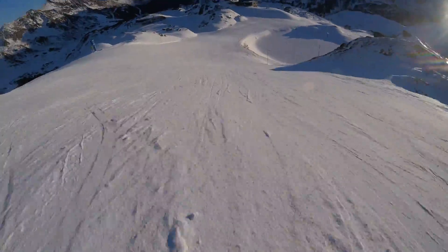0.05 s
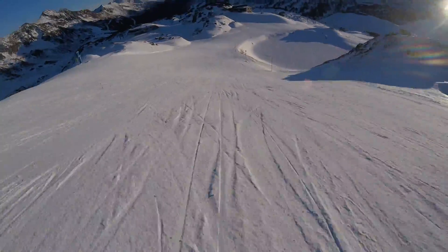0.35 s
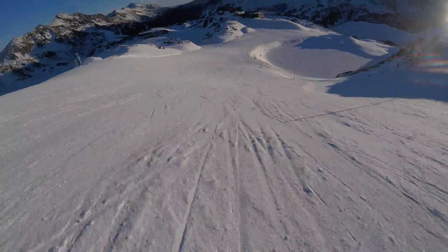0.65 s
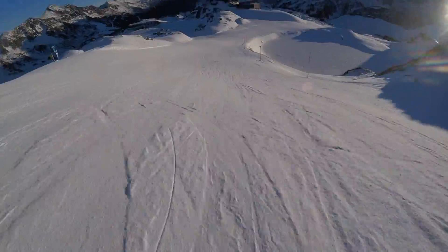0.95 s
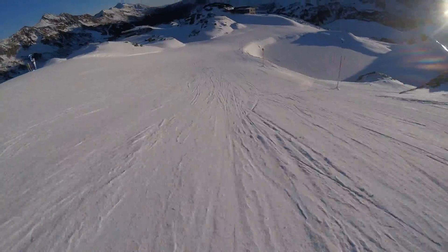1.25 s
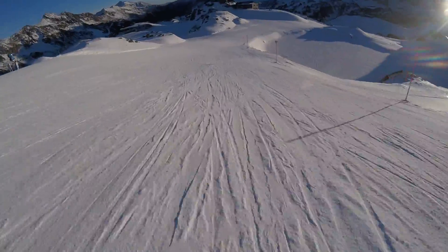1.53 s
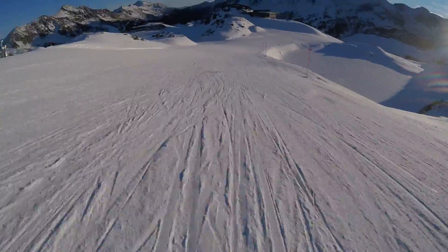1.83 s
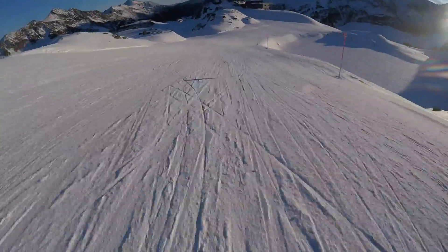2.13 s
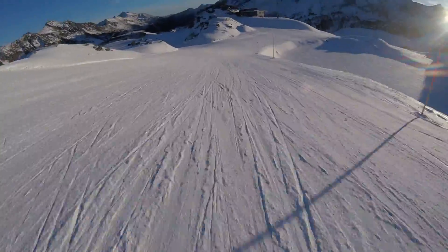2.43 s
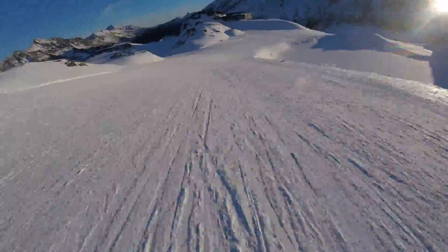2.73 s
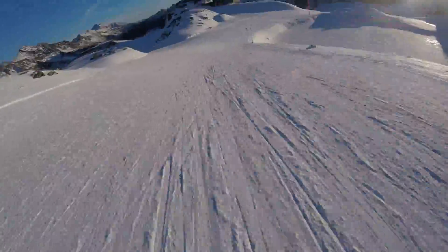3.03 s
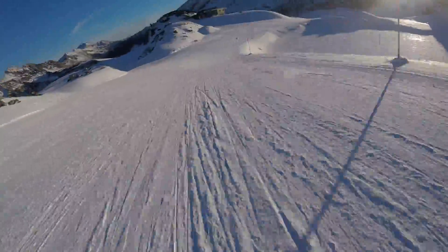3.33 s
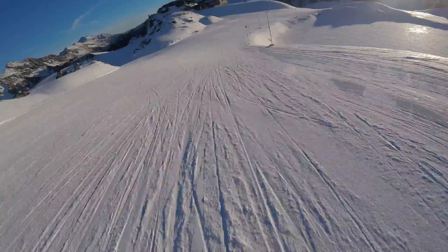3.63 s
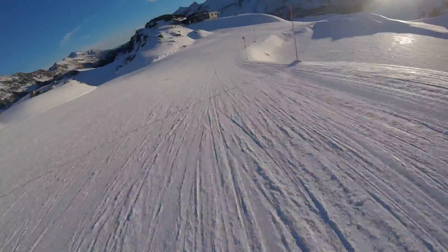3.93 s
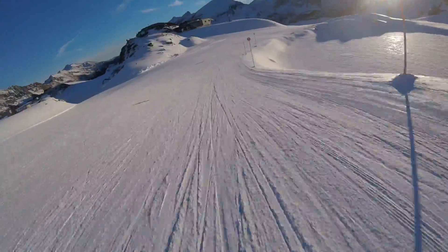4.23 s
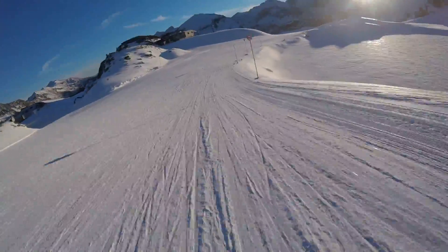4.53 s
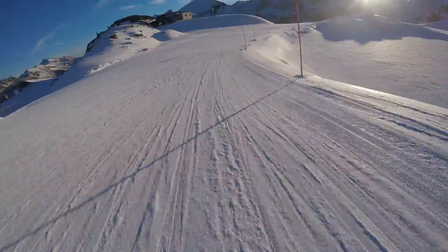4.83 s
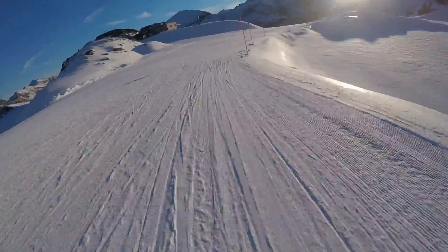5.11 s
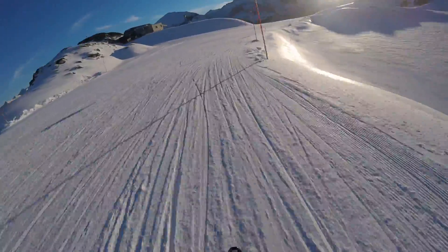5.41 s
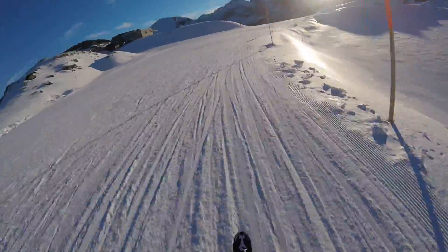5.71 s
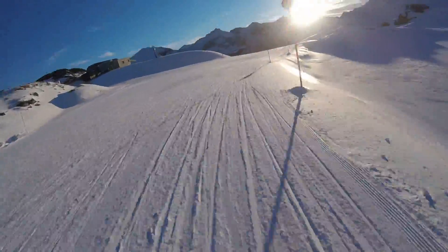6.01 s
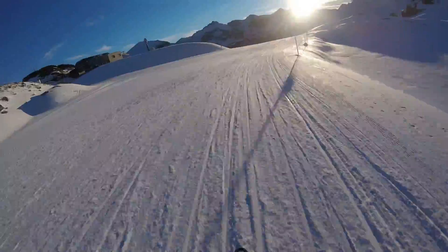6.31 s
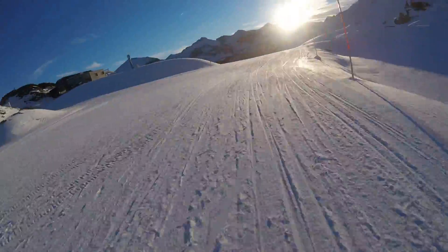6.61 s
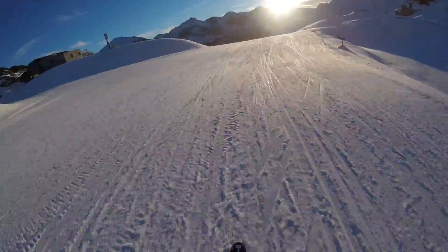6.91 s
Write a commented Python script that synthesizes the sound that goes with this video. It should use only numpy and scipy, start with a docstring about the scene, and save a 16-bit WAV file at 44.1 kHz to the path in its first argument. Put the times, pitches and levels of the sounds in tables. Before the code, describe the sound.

Skis run down a groomed slope with a continuous, grainy hiss, their edges scraping over hard snow under a faint fizz of powder. Head wind rumbles and gusts against the skier's camera and blows a hollow, airy note in its housing. Bumps shake the mount with short, low thuds, coming more often after about two seconds. Everything sounds close and boxy, heard from inside the closed camera case.

```python
"""Skis run down a groomed slope of hard snow, heard from an action camera worn by the skier.
Countless snow grains break under the bases and edges; their hiss rings in the camera's closed housing.
Fine powder sprays on top, and now and then an edge sizzles over ice.
Head wind buffets the housing and blows its main cavity; wind and bumps make the mount boom."""
import sys
import numpy as np
from scipy import signal
from scipy.fft import rfft, irfft
from scipy.io import wavfile
from scipy.ndimage import uniform_filter1d, minimum_filter1d

SR = 44100
rng = np.random.default_rng(int(sys.argv[2]) if len(sys.argv) > 2 else 0)


def waveform_to_disk(signal):
    """Save audio, clipped to [-1, 1], as 16-bit WAV at the path in sys.argv[1]."""
    frames = np.transpose(np.atleast_2d(signal))
    scaled = np.clip(frames, -1, 1) * 32767
    samples = np.round(scaled).astype(np.int16)
    wavfile.write(sys.argv[1], SR, samples)


N = 311346
TIME = np.arange(N) / SR
FREQS = np.maximum(np.fft.rfftfreq(N, 1 / SR), 1)


def undb(db):
    """Decibels to gain."""
    return 10 ** (np.asarray(db) / 20)


def unit(x):
    """Scale to an rms of one."""
    return x / np.sqrt(np.mean(x ** 2))


def fader_curves(table):
    """One curve per level column, ramping between the rows' times."""
    times, *columns = np.transpose(table)
    return [np.interp(TIME, times, column) for column in columns]


def swell(centre, length):
    """A bell-shaped rise and fall that peaks at one; times in seconds."""
    return np.exp(-(2 * (TIME - centre) / length) ** 2)


def swells_db(table):
    """Change of level in dB from rows of passing swells."""
    return sum(db * swell(centre, length) for centre, length, db in table)


def eq_curve(points):
    """Frequency response through (Hz, dB) points."""
    hz, db = np.transpose(points)
    return undb(np.interp(np.log(FREQS), np.log(np.sort(hz)), db))


def resonances(modes):
    """Frequency response of steep-sided (Hz, width in Hz, dB) resonances whose powers add."""
    peaks = (undb(db) / (1 + (2 * (FREQS - hz) / width) ** 2) for hz, width, db in modes)
    return np.sqrt(sum(peak ** 2 for peak in peaks))


def colour(x, response):
    """Filter by a frequency response; rms one."""
    return unit(irfft(rfft(x) * response, N))


def wander(rate):
    """A smooth random drift through rate new values a second; rms one."""
    hold = max(int(SR / rate), 1)
    steps = rng.standard_normal(N)[np.arange(N) // hold]
    return unit(uniform_filter1d(uniform_filter1d(steps, hold), hold))


def turbulence(response, eddy_rate, eddy_db):
    """Air noise that swells with each passing eddy."""
    return colour(rng.standard_normal(N) * undb(eddy_db * wander(eddy_rate)), response)


def steady(x, span_s):
    """Even out swells longer than span_s, as under a constant drive."""
    power = uniform_filter1d(x ** 2, max(int(span_s * SR), 1))
    return unit(x / np.sqrt(power + 1e-6))


# The deep thump of wind on the housing. Each row: frequency in Hz, gain in dB.
BUFFET_EQ = [(2, -15), (7, 2.5), (12, -3), (20, -1.5), (30, -8.5), (40, -14), (55, -17), (80, -15.5),
             (110, -27.5), (170, -44), (400, -73)]
# Gusts and lulls. Each row: centre in seconds, length in seconds, level change in dB.
GUSTS_AND_LULLS = [(.11, 0.086, -5), (.62, 0.57, 3.5), (.9, 0.06, 9.5), (1.02, 0.087, -2), (1.73, 0.12, 3),
                   (2.05, .25, 2.5), (2.98, 0.12, 5), (3.82, 0.089, 3), (4.04, 0.14, -4.5),
                   (4.49, 0.093, 5), (4.81, 0.065, 6), (5.22, .1, -2), (5.8, 0.28, 1), (6.04, 0.09, -8),
                   (6.35, 0.092, 6)]
# The soft rush of passing air. Each row: frequency in Hz, gain in dB.
RUSH_EQ = [(60, -19), (130, 0.5), (170, -0.5), (220, -1), (260, -3), (400, -4), (560, -6), (800, -7.5),
           (1100, -9), (2000, -27), (5000, -51)]
# The fader ride on that rush. Each row: time in seconds, level in dB.
RUSH_FADER = [(0, -35), (0.65, -33), (0.97, -38.0), (1.6, -32.5), (2.15, -37), (2.35, -33), (2.75, -36),
              (3.08, -33.5), (3.7, -35.5), (4.6, -34), (5.0, -36.5), (5.6, -35), (5.98, -33.4),
              (6.4, -36.5), (7.05, -35.5)]


def head_wind(rush_db):
    """Large eddies push on the housing, harder in gusts; small ones rush past it."""
    buffet = steady(turbulence(eq_curve(BUFFET_EQ), eddy_rate=10, eddy_db=1.0), span_s=0.137)
    buffet_db = -23.5 + swells_db(GUSTS_AND_LULLS)
    rush = turbulence(eq_curve(RUSH_EQ), eddy_rate=29, eddy_db=0.43)
    return buffet * undb(buffet_db) + rush * undb(rush_db)


# The boomy sway of the mount. Each row: frequency in Hz, width in Hz, gain in dB.
MOUNT_MODES = [(108.5, 18.6, -2.5), (92.4, 22, -8)]
# Rougher stretches of piste. Each row: centre in seconds, length in seconds, lift of the boom in dB.
ROUGH_SNOW = [(3.3, .7, 3.5), (5.2, 2.6, 3)]


def mount_boom(rush_db):
    """The mount booms with the head wind; rough snow lifts the boom and, more so, a broad rumble."""
    boom = steady(turbulence(resonances(MOUNT_MODES), eddy_rate=22, eddy_db=-0.2), span_s=0.1)
    rumble = steady(turbulence(resonances([(69.4, 54, 0)]), eddy_rate=15, eddy_db=2.5), span_s=0.17)
    rough_db = swells_db(ROUGH_SNOW)
    boom_db = -33.5 + rough_db + (rush_db - rush_db.mean())
    rumble_db = -36 + 1.74 * rough_db
    return boom * undb(boom_db) + rumble * undb(rumble_db)


# The housing's main air cavity. Its one row: frequency in Hz, width in Hz, gain in dB.
CAVITY_MODE = [(1357.5, 140, 0)]
# The air stream catches the cavity (up) or slips off it (down).
# Each row: centre in seconds, length in seconds, level change in dB.
CAVITY_BREATHS = [(.55, .25, -3.5), (2.15, 0.59, 2), (2.72, .22, -4), (3.84, .08, 2.5), (4.01, .12, -7),
                  (4.22, 0.099, 3.5), (4.42, .12, -4.5), (4.86, 0.19, 4.5), (5.6, .6, 1.5),
                  (5.95, 0.14, 6.5), (6.83, 0.17, 3)]


def cavity_note():
    """Wind blows the housing's cavity into a hollow, airy note."""
    note = steady(turbulence(resonances(CAVITY_MODE), eddy_rate=29, eddy_db=0.6), span_s=0.21)
    return note * undb(-26 + swells_db(CAVITY_BREATHS))


# Bumps that shake the mount. Each row: centre in seconds, length in seconds, peak swing in dB.
BUMPS = [(0.283, .1, -29.5), (1.28, .1, -28), (1.855, 0.13, -27), (2.243, 0.098, -19), (2.96, 0.048, -22.5),
         (3.141, 0.068, -21), (3.547, 0.079, -22), (3.956, .04, -21), (4.117, 0.07, -22.5),
         (4.25, 0.11, -24), (4.668, .09, -22.5), (5.138, 0.063, -23), (5.35, 0.13, -21.5),
         (5.512, 0.05, -22.5), (5.77, 0.06, -24), (5.975, 0.16, -22)]


def mount_judders(sway_hz=106, pitch_drift=0.045, octave_db=-20.5, knock_db=-13.5):
    """Each bump swings the mount briefly; hitting the end of its play adds the octave and dull knocks."""
    pitch_hz = sway_hz * (1 + pitch_drift * wander(30))
    phase = 2 * np.pi * np.cumsum(pitch_hz) / SR
    knock = colour(rng.standard_normal(N), resonances([(225, 205, 0)]))
    swing = sum(undb(db) * swell(centre, length) for centre, length, db in BUMPS)
    return swing * (np.sin(phase) + undb(octave_db) * np.sin(2 * phase) + undb(knock_db) * knock)


# Ice crystals at the edge. Each row: centre in seconds, length in seconds, pitch in Hz, level in dB.
ICE_CRYSTALS = [(0.4, .02, 11300, -55), (.477, .022, 10700, -46), (.497, .03, 10600, -48),
                (.526, .04, 10950, -50), (4.53, .025, 11400, -54), (4.555, .02, 10500, -48),
                (4.615, .025, 11700, -52)]


def ice_sizzles(width_hz=550):
    """Short, very high rasps of the edge over ice."""
    sizzles = np.zeros(N)
    for centre, length, hz, db in ICE_CRYSTALS:
        rasp = colour(rng.standard_normal(N), resonances([(hz, width_hz, 0)]))
        sizzles += undb(db) * swell(centre, length) * rasp
    return sizzles


def snow_grains(per_second, spread_db, bed):
    """Snow crystals breaking: ticks of uneven size over a bed of finer friction."""
    breaks = rng.random(N) < per_second / SR
    sizes = undb(spread_db * np.minimum(rng.exponential(size=N), 6))
    ticks = unit(breaks * sizes * rng.choice([-1, 1], N))
    return unit(ticks + bed * rng.standard_normal(N))


# The bright fizz of flying powder. Each row: frequency in Hz, gain in dB.
POWDER_EQ = [(5000, -7.5), (7000, -1), (8100, -18), (9100, -3.5), (9700, 1), (10400, 2), (10700, -3),
             (11100, 2), (11500, -3), (12100, -1), (12900, -7), (13500, -19), (14100, -24)]


def powder_spray(glide_db, edge_db, fade_db_per_s=0.3):
    """Fine powder sprays more as the skis take load and the edges bite."""
    spray = colour(snow_grains(per_second=4600, spread_db=3.0, bed=1.4), eq_curve(POWDER_EQ))
    load_db = 1.3 * (glide_db - glide_db.mean())
    bite_db = 0.5 * (edge_db - edge_db.mean())
    fade_db = fade_db_per_s * (TIME - TIME.mean())  # less loose powder farther down the run
    flutter_db = 0.99 * wander(22)
    return spray * undb(-50 + load_db + bite_db - fade_db + flutter_db)


# The boxy ring of the closed housing. Each row: frequency in Hz, width in Hz, gain in dB.
HOUSING_MODES = [(932, 67, -19.5), (1456, 453, -7), (1957, 620, -11), (2407, 280, -11), (2721, 483, -3),
                 (2993, 400, -7), (3475, 170, -10), (3666, 310, -10), (4010, 95, -15.5), (4235, 280, -16.5),
                 (4802, 465, -13.5), (5094, 400, -16.5), (5520, 260, -18), (5950, 340, -18),
                 (6380, 540, -19.5), (6660, 430, -24.5), (7330, 510, -29), (7660, 160, -28),
                 (8330, 120, -33), (8710, 220, -39)]
# The load on the skis. Each row: time in seconds, glide level in dB before its trim,
# edge scrape in dB relative to that level.
SKI_LOAD = [(0, -22, -11), (0.47, -20.0, -12.1), (0.97, -23, -12.5), (1.6, -20, -12), (1.9, -22, -13),
            (2.55, -21.5, -11.5), (3.03, -22.5, -13.5), (3.45, -21.5, -10.7), (3.8, -22.5, -11.5),
            (4.55, -21, -10.5), (5.35, -21.5, -11.5), (5.6, -23, -11.5), (5.78, -20, -13),
            (5.92, -23, -13.9), (6.14, -20.5, -10.2), (6.5, -24.0, -13.5), (6.75, -21.5, -11.5),
            (7.05, -22.6, -13.7)]


def skis(glide_db, edge_db, crossover_hz=5200, glide_trim_db=0.74):
    """Breaking snow rings in the housing: the bases hiss below the crossover, the edges scrape above."""
    pressure = undb(0.32 * wander(45) + 0.15 * wander(11))  # ruts vary the pressure on both skis
    crunch = snow_grains(per_second=8000, spread_db=2.5, bed=1.62) * pressure
    housing = resonances(HOUSING_MODES)
    edge_share = 1 / (1 + (crossover_hz / FREQS) ** 8)
    glide = colour(crunch, housing * (1 - edge_share)) * undb(glide_db + glide_trim_db)
    scrape = colour(crunch, housing * edge_share) * undb(glide_db + edge_db)
    return glide + scrape


def scene():
    """Snow, wind and the shaking camera all reach one microphone inside the housing."""
    glide_db, edge_db = fader_curves(SKI_LOAD)
    rush_db, = fader_curves(RUSH_FADER)
    snow = skis(glide_db, edge_db) + powder_spray(glide_db, edge_db) + ice_sizzles()
    wind = head_wind(rush_db)
    camera = mount_boom(rush_db) + cavity_note() + mount_judders()
    return (snow + wind + camera)[None]


def record(dry, ceiling=0.51, top_hz=13700):
    """The camera's limiter eases down the highest peaks, and a steep low-pass cuts the top."""
    hold = SR // 100  # 10 ms
    gain = ceiling / np.maximum(np.abs(dry), ceiling)
    gain = uniform_filter1d(minimum_filter1d(gain, hold), hold)
    low_pass = signal.ellip(8, 0.2, 80, top_hz, fs=SR, output="sos")
    return signal.sosfilt(low_pass, dry * gain)


dry = scene()
out = record(dry)
waveform_to_disk(out)
```